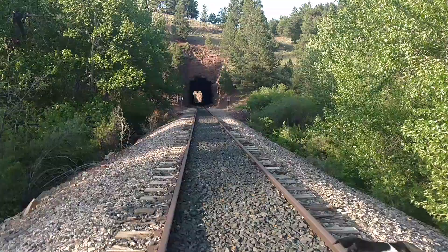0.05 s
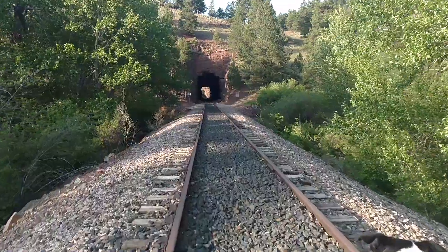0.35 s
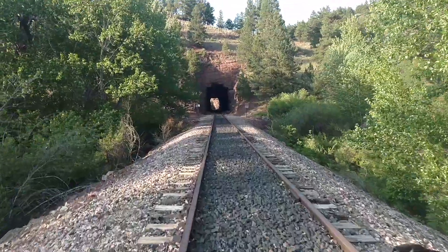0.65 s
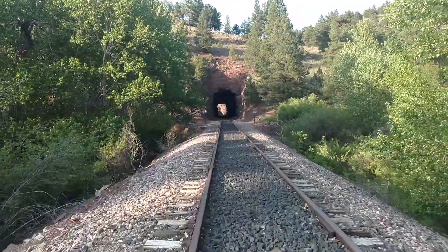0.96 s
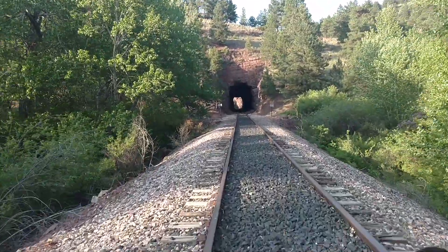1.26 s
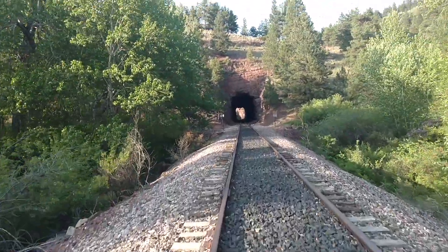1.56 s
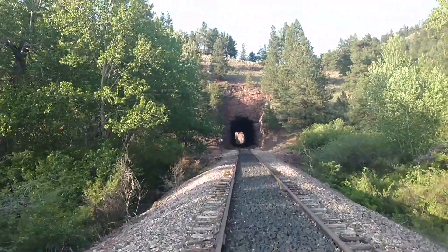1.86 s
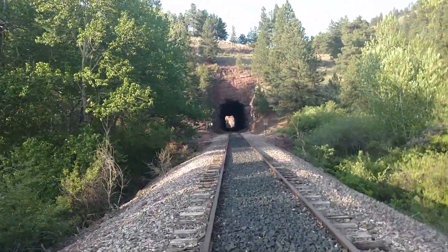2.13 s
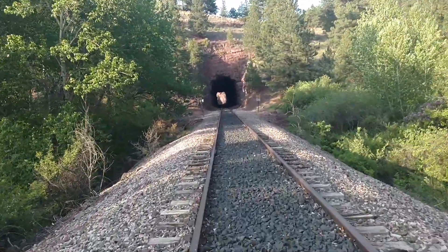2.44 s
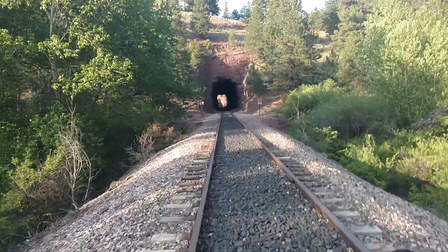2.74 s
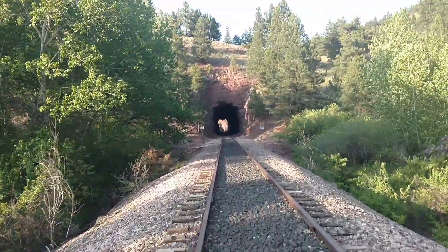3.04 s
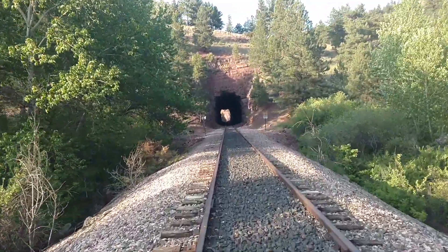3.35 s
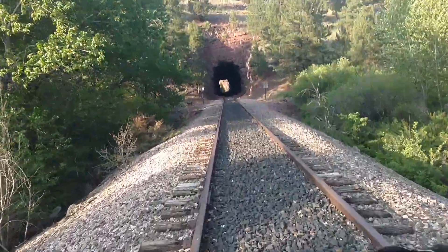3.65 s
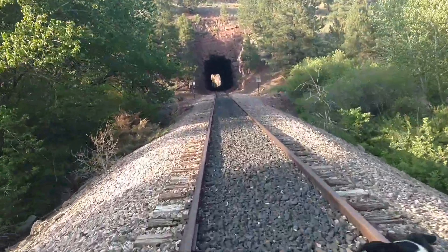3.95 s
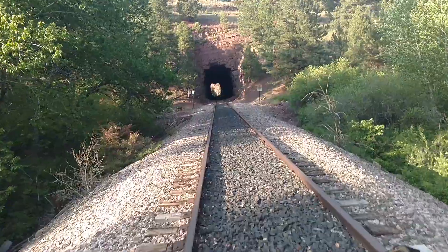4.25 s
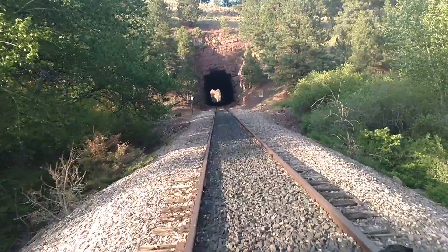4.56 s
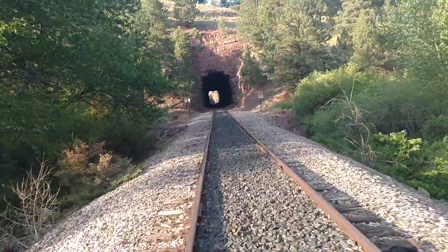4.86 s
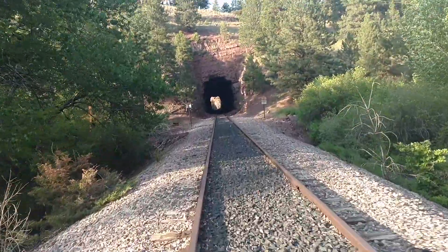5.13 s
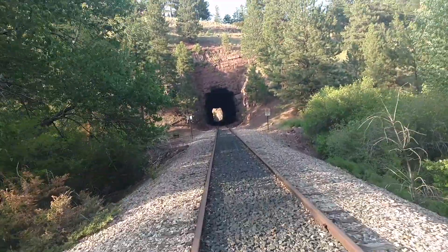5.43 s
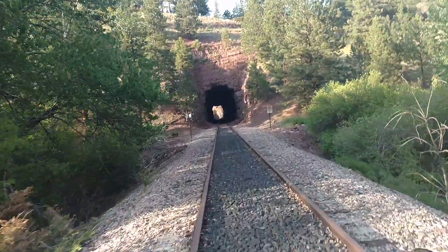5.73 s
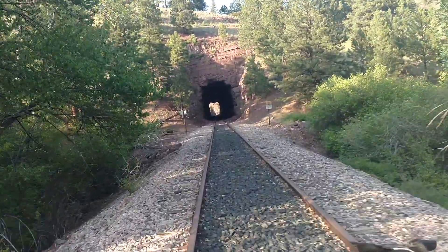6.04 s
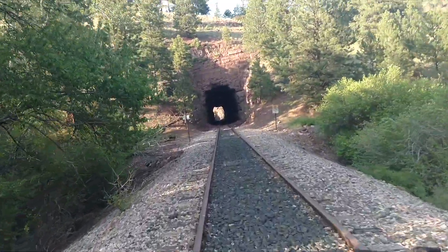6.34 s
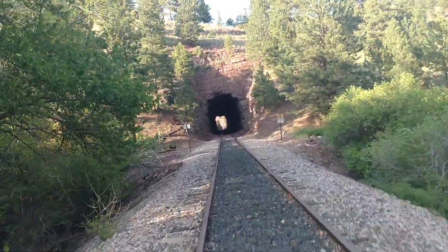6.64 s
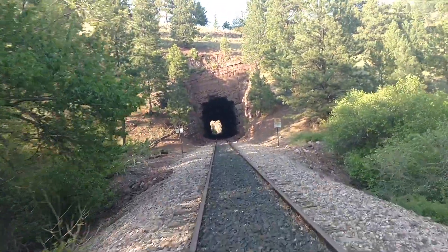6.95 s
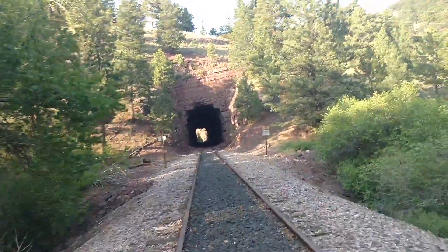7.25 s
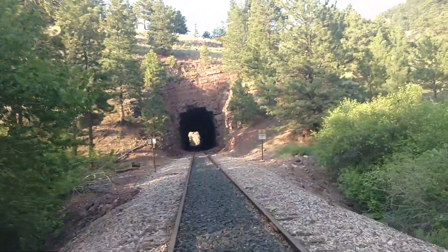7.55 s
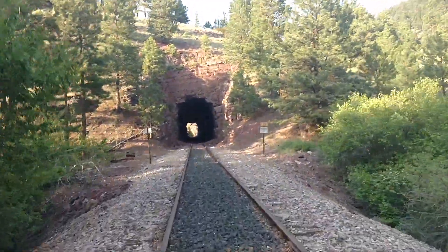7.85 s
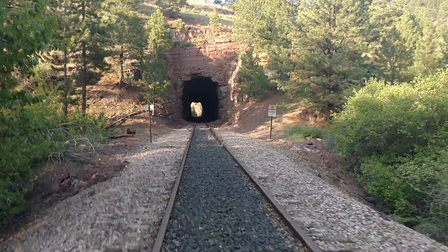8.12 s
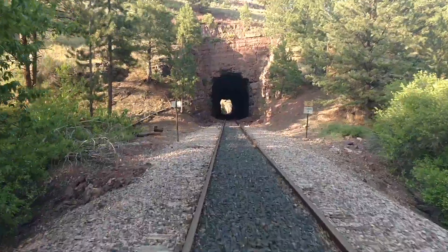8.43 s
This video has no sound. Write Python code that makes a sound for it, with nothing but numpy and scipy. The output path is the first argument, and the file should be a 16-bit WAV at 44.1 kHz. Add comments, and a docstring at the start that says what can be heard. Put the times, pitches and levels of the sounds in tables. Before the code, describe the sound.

Steel wheels clack and rebound about four times a second as a small rail car slowly gathers speed outdoors. The stereo microphone rides near the wheels, picking up a continuous rolling roar, a low engine drone, short metallic rings and rattling fittings. In the second half the rough track sets the floor booming more strongly, and a faint high singing from the wheel rim joins toward the end.

```python
"""Riding a small rail motor car

Open track, a stereo microphone pair on board, close to the wheels. The car slowly gathers speed, its
engine droning under the roar of steel on rail; rough track sets the floor booming and fittings ticking.
Once a wheel turn, about four times a second, loose steel strikes sharply, rebounds with a knock
a fifth of a turn later, and the wheel disc rings."""
import sys
import numpy as np
from scipy import signal
from scipy.fft import rfft, irfft
from scipy.io import wavfile
from scipy.ndimage import uniform_filter1d

SR = 44100
rng = np.random.default_rng(int(sys.argv[2]) if len(sys.argv) > 2 else 0)


def unload_wav(signal):
    """Save mono or channel-first audio to the path in sys.argv[1] as 16-bit WAV at rate SR, clipped to [-1, 1]."""
    wavfile.write(
        sys.argv[1],
        SR,
        np.round(np.clip(np.atleast_2d(signal).T, -1, 1) * 32767).astype(np.int16),
    )


N = 378819
START_TURNS_PER_S, CRUISE_TURNS_PER_S, SPEEDUP_S = 3.8, 4.39, 4.2
MID_ONLY = np.array([[1], [0]])  # every source has two rows: mid and side

# engine speed (time [s], firing rate [Hz])
ENGINE_SPEED = [(0, 28.26), (.53, 28.55), (1.25, 29.35), (3.5, 29.28), (4.8, 29.05), (6.2, 29.33),
                (8.59, 29.2)]
# engine tone (multiple of the firing rate, relative level [dB], change while running slow [dB])
ENGINE_HARMONICS = [(2, -22, -9), (3, -28, -2), (4, -16, 4.5), (5, -5, -4.5), (6, -16, 8), (7, -29, 2),
                    (8, 0, 0), (9, -20, 6), (10, -14, -4), (11, -7.5, -6), (12, -23, 6), (13, -10, -4),
                    (15, -18, 4), (16, -21.5, 2), (18, -6.5, -5), (19, -12.5, -4), (20, -35, -1),
                    (21, -11, -18), (28, -12.5, -6.5), (32, -14.5, -4), (34, -15, -9), (37, -15.5, -1),
                    (41, -12.5, -12)]
# pull of the engine, roughness of the track, boom of the floor, song of the rim (time [s], level [dB])
ENGINE_EFFORT = [(0, -1), (.6, 2), (1.5, 1), (2.1, -0.2), (4.2, -1), (4.5, -1.3), (6.1, -1), (6.7, 1.5),
                 (7.9, 0.5), (8.59, -3)]
TRACK_ROUGHNESS = [(0, -28.5), (.7, -24), (1.5, -21.5), (2.03, -28), (2.35, -22), (2.9, -25), (3.4, -25.5),
                   (3.8, -27.5), (4.15, -20.5), (4.45, -29.5), (4.95, -24.5), (6.1, -25), (6.75, -19.5),
                   (7.45, -24), (7.95, -20.5), (8.55, -25)]
FLOOR_BOOM = [(0, -42), (1.2, -35), (1.6, -34), (1.95, -46), (2.8, -45), (3.5, -32), (3.75, -42),
              (4.1, -45), (4.5, -51), (5.4, -29.5), (5.85, -35), (6.4, -31), (6.7, -30), (6.95, -26),
              (7.25, -31), (7.9, -29), (8.4, -41)]
RIM_SONG = [(0, -38.5), (4.5, -66), (6.3, -43), (6.9, -43), (7.3, -36.5), (7.85, -34.5), (8.25, -37),
            (8.59, -35)]
# resonances of the wheel disc, and a thin whine near 1510 Hz
# (frequency [Hz], width [Hz], lift at ringing=1 [dB])
WHEEL_PEAKS = [(590, 45, 6), (925, 45, 5.5), (1337, 53, 7.5), (1405, 30, 4), (1510, 6, 8), (1618, 30, 13),
               (2230, 26, 7.5), (2480, 6, 8), (3199, 15, 9), (3390, 50, 9), (3840, 43, 10), (3900, 84, 3),
               (4137, 68, 6.5), (4620, 16, 11), (4659, 27, 10), (4940, 140, 8), (5450, 55, 11),
               (5545, 29, 13), (6480, 35, 7), (6595, 34, 10), (7214, 30, 7), (7545, 165, 8.5),
               (8380, 100, 10), (8846, 28, 10.5), (9205, 30, 10), (9908, 40, 12), (11413, 35, 10),
               (13200, 120, -5)]
# spectra of the rolling noises and of the blows (frequency [Hz], relative level [dB])
BODY_RUMBLE = [(25, -33), (45, -8), (70, -5), (100, 1.5), (135, 2.5), (200, 5), (228, 8), (255, 12),
               (285, 7.5), (340, 3), (450, -0.5), (700, -32.5)]
TREAD_ROAR = [(250, -50), (450, 0.5), (600, -1.5), (800, 0.5), (1200, 0), (1500, -3), (1800, 0), (2100, -4),
              (2600, -4.5), (4000, -25.5), (8000, -65)]
WHEEL_HISS = [(1200, -36), (2200, -20), (3200, 3.5), (3700, 0), (4500, 2), (5700, 0.5), (6500, -6.5),
              (9000, -6.5), (10500, -9.5), (12500, -12.5), (15500, -24)]
FLANGE_RUB = [(4000, -32), (5500, 5), (7000, 1), (9200, -2), (10500, 1.5), (12500, -8), (15500, -28)]
STEEL_CHATTER = [(700, -2), (1400, 5.5), (1900, 13.5), (2500, 3), (3200, 7), (4200, 4), (5200, 7),
                 (6500, -5), (8000, -7), (12000, -41)]
STEEL_KNOCK = [(250, -14), (450, 1), (600, 5), (900, 2.5), (1300, 3), (1600, -3), (2000, -4), (2600, 3),
               (5000, -34.5)]
STEEL_SPLASH = [(5000, -20), (7000, -3.5), (9000, 0), (10500, -3), (12000, -4), (14200, -5), (15500, -49)]
# the wheel disc rings out (time [s], level [dB], frequency [Hz], swell time [s])
DISC_RINGS = [(0.169, -16, 1680, 0.0089), (.238, -14, 1620, 0.016), (.517, -8, 1620, 0.02),
              (.794, -13.5, 1598, 0.0076), (1.006, -10.5, 1670, 0.0055), (1.064, -15.5, 1630, 0.0072),
              (1.331, -11, 1615, 0.013), (1.556, -13, 1630, 0.0091), (1.676, -15, 1608, 0.014),
              (1.788, -12, 1674, 0.0067), (1.863, -15, 1598, 0.014), (1.949, -27, 1615, 0.011),
              (2.069, -13, 1634, 0.0096), (2.117, -15, 1600, 0.0072), (2.577, -11.5, 1630, 0.0061),
              (2.885, -22, 1615, 0.012), (3.081, -14.5, 1647, 0.0089), (3.22, -14.5, 1606, 0.011),
              (3.348, -17, 1610, 0.011), (3.381, -14, 1635, 0.014), (3.625, -15.5, 1612, 0.018),
              (4.095, -18, 1635, 0.011), (4.136, -14, 1608, 0.017), (4.602, -21, 1613, 0.012),
              (4.843, -8, 1618, 0.01), (5.324, -23, 1590, 0.011), (5.52, -18, 1618, 0.015),
              (5.756, -12, 1640, 0.0071), (6.05, -20, 1610, 0.021), (6.279, -12, 1610, 0.012),
              (6.518, -11, 1614, 0.014), (6.565, -12, 1623, 0.0088), (6.717, -14, 1603, 0.0074),
              (6.802, -15, 1630, 0.012), (6.99, -15.5, 1603, 0.015), (7.688, -19, 1630, 0.011),
              (8.129, -14.5, 1634, 0.0074), (8.176, -14.5, 1620, 0.017), (8.41, -15.5, 1627, 0.015)]
# one clack a wheel turn (time [s], strike [dB], rebound [dB], knock [dB], brightness [dB])
WHEEL_TURNS = [(0.185, -12.5, -34, -16, 0), (0.462, -17, -19.5, -9.5, -10), (0.736, -18.5, -14, -10.5, 1),
               (1.008, -9, -24, -13, -2), (1.279, -10, -18, -11, -4), (1.543, -13.5, -18, -7, -4),
               (1.805, -12.5, -19, -11.5, 3.5), (2.067, -11.5, -16.5, -9, 5.5), (2.324, -13, -19, -11, 2.5),
               (2.579, -10, -42, -16, -0.5), (2.831, -15, -15, -8.5, 5), (3.084, -10, -15, -9.5, 3.5),
               (3.333, -11.5, -13, -7.5, 2.5), (3.579, -10, -11.5, -9, -1), (3.826, -15.5, -15, -9, -1),
               (4.071, -13, -18, -11.5, -3), (4.314, -11, -22.5, -14.5, 1), (4.557, -37, -13.5, -16.5, 0),
               (4.797, -13, -14, -11.5, 0.5), (5.039, -17, -12.5, -8.5, 0), (5.280, -27, -15, -9, -7),
               (5.519, -10, -15, -13.5, 2.5), (5.76, -12.5, -16.5, -14, 2.5), (5.996, -16, -22, -13.5, 1),
               (6.231, -31, -13, -12, -4), (6.464, -19, -33, -9, -4), (6.708, -12.5, -18.5, -13.5, 2),
               (6.947, -15, -17, -14, 2), (7.185, -19, -18.5, -8, 0), (7.419, -20.5, -21, -13, 4),
               (7.655, -32, -23, -10.5, -5), (7.894, -21, -29, -11.5, -6), (8.131, -12, -41, -11.5, 7),
               (8.366, -12.5, -32, -10.5, 7)]
# blows within each turn (delay [turns], rebound weight [0-1], chatter [dB], knock [dB], chatter decay [s])
TURN_BLOWS = [(0, 0.05, 1, -5.5, 0.011), (0.127, 0.98, -5, -4, 0.0063), (0.203, 0.98, -0.7, -1.5, 0.012),
              (.29, 0.8, -31, -13.5, 0.025), (.56, 0.3, -21, -22.5, 0.04), (0.702, 0.4, -28, -16.5, 0.021)]
# stray blows of the loose steel (time [s], chatter [dB], brightness [dB], knock [dB], chatter decay [s])
STRAY_BLOWS = [(.242, -25, -2, -16, 0.0094), (.500, -23, -4, -11, 0.0079), (1.045, -19, -7, -27, .007),
               (1.560, -14.5, -4, -18, 0.012), (1.577, -16, -2, -19, .009), (3.353, -14, 0, -12, .012),
               (4.102, -18, -7, -16, 0.016), (5.093, -20, 7, -20, 0.01), (6.001, -8.5, -8, -19, 0.0062),
               (6.649, -25, -2, -18, 0.0071), (7.942, -13.5, 2, -8, 0.0063)]
# the microphone pair (frequency [Hz], left minus right [dB], side minus mid [dB], comb depth [dB])
MIC_PAIR = [(40, -2, 8, 2), (70, -10, 7.5, 6.5), (130, -2.5, -11, 1), (350, -4, -4, -12),
            (700, -1.5, -13.5, 2), (1390, -1.2, -9.5, 11), (1880, -5, 0, -0.5), (2532, -0.5, 3, 19),
            (3270, 2, -8.5, -5), (4770, -5.5, 1, 15.5), (5300, 1.5, -0.5, 19.5), (8950, -0.5, 1, 13),
            (15000, 0, 2.5, 8)]
# shifted stereo image (frequency [Hz], change of left minus right [dB], change of side minus mid [dB])
IMAGE_SHIFT = [(200, -1, -1.5), (1600, 2.5, 0.5), (2490, 1.5, -8.5), (3280, -2, 5), (4650, 5, 11.5),
               (5400, -2.5, -1), (6300, 7.5, -10), (8700, 0.5, 0)]
# the image settles and later drifts back (time [s], share of the shifted image [0-1])
IMAGE_DRIFT = [(0, 0.86), (1.3, 0.8), (1.9, 0), (7, 0), (8.2, 0.56)]


def undb(db):
    """Decibels to gain."""
    return 10 ** (np.asarray(db) / 20)


def unit(x):
    """Scale to rms 1."""
    return x / np.sqrt(np.mean(x ** 2))


def curve(table):
    """A table of (time [s], value), sample by sample."""
    return np.interp(np.arange(N) / SR, *np.transpose(table))


def bins():
    """Frequencies of the spectrum, Hz."""
    return np.maximum(np.arange(N // 2 + 1) * SR / N, 1)


def gains(table):
    """Gain at every frequency for each dB column of a table."""
    hz, *columns = np.transpose(table)
    return [undb(np.interp(np.log(bins()), np.log(hz), c)) for c in columns]


def noise(response):
    """Two unrelated noises of rms 1 with the given response."""
    return unit(irfft(rfft(rng.standard_normal((2, N))) * response, N))


def walk(rate_hz):
    """Smooth random wander of rms 1."""
    k = int(SR / rate_hz)
    steps = np.repeat(rng.standard_normal(N // k + 1), k)
    return unit(uniform_filter1d(uniform_filter1d(steps, k), k)[:N])


def wheel(force, spectrum, ringing, grain_db=5):
    """Countless tiny impacts of uneven size, coloured by the wheel's resonances and a thin whine."""
    f = bins()
    response = gains(spectrum)[0]
    for hz, width, db in WHEEL_PEAKS:
        detune = 1j * (f * f - hz * hz) / (f * width)
        response = response * (undb(ringing * db) + detune) / (1 + detune)
    impacts = unit(rng.standard_normal((2, N)) * undb(grain_db * np.clip(rng.standard_normal(N), -2, 2)))
    return irfft(rfft(force * impacts) * response / np.sqrt(np.mean(abs(response) ** 2)), N)


def blows(times, sizes, rise_s, decay_s):
    """Contact force that jumps at each blow and dies away; overlapping blows add in power."""
    power, t = np.zeros(N + SR), np.arange(SR // 3) / SR
    for s, size, decay in np.broadcast(times, sizes, decay_s):
        start = int(s * SR)
        power[start:start + len(t)] += (size * (1 - np.exp(-t / rise_s)) * np.exp(-t / decay)) ** 2
    return np.sqrt(power[:N])


def turn_rate(t):
    """Wheel turns per second at time t: the car gathers speed and levels off."""
    return CRUISE_TURNS_PER_S + (START_TURNS_PER_S - CRUISE_TURNS_PER_S) * np.exp(-t / SPEEDUP_S)


def ride(speed_db, follow):
    """Level in dB: track roughness, its swings scaled by follow, less speed_db per turn/s below cruise."""
    track = curve(TRACK_ROUGHNESS)
    below_cruise = CRUISE_TURNS_PER_S - turn_rate(np.arange(N) / SR)
    return track.mean() + follow * (track - track.mean()) - speed_db * below_cruise


def pressure(peak_turn=0.35):
    """Load of the out-of-round wheel on the rail, -1 to 1 once a turn."""
    turns = curve([(row[0], k) for k, row in enumerate(WHEEL_TURNS)])
    return np.cos(2 * np.pi * (turns - peak_turn))


def strikes():
    """Every turn plays the same pattern of blows and stray ones join in; columns as in STRAY_BLOWS."""
    rows = []
    for s, strike, rebound, turn_knock, bright in WHEEL_TURNS:
        for delay, weight, chatter, knock, decay in TURN_BLOWS:
            peak = chatter + (1 - weight) * strike + weight * rebound
            rows.append((s + delay / turn_rate(s), peak, bright, knock + turn_knock, decay))
    return np.array(rows + list(STRAY_BLOWS))


def engine(db=-27, waver=.0022, flutter_db=1.7, wobble_rad=.22, drone_order=8, slow_span_hz=1.0):
    """Firing harmonics shift balance with speed; the main drone is firm, the rest shake with the car."""
    firing_hz = curve(ENGINE_SPEED)
    slow = np.clip((np.median(firing_hz) - firing_hz) / slow_span_hz, 0, 1)
    phase = 2 * np.pi * np.cumsum(firing_hz * (1 + waver * walk(14))) / SR
    tone = 0
    for order, order_db, slow_db in ENGINE_HARMONICS:
        loose = .3 if order == drone_order else 1
        offset = rng.uniform(0, 2 * np.pi) + loose * wobble_rad * walk(12)
        gain = undb(order_db + slow_db * slow + loose * flutter_db * walk(7.4))
        tone = tone + gain * np.exp(1j * (order * phase + offset))
    # the side channel hears the drone a quarter cycle off
    return undb(db + curve(ENGINE_EFFORT)) * unit(np.array([tone.real, tone.imag]))


def rolling(rumble_db=-7, roar_db=-1, hiss_db=-7.5, shake_db=2, press_db=0.6):
    """Rough rail shakes the body and keeps the wheels roaring and hissing."""
    shake, load = shake_db * walk(45), press_db * pressure()
    rumble = undb(ride(speed_db=4.5, follow=0.54) + rumble_db + shake)
    body = rumble * noise(gains(BODY_RUMBLE)[0])
    roar = undb(ride(speed_db=0, follow=0.74) + roar_db + shake + load)
    tread = wheel(roar, TREAD_ROAR, ringing=1)
    hiss = undb(ride(speed_db=7.5, follow=0.48) + hiss_db + load + walk(60) - 0.5 * walk(600))
    return body + tread + wheel(hiss, WHEEL_HISS, ringing=0.72, grain_db=3.5)


def resonance(hz, half_width_hz):
    """Response of a single mode, 1 at its peak."""
    return 1 / (1 + ((bins() - hz) / half_width_hz) ** 2)


def floor_boom(db=-2, low_mode_db=-4):
    """Rough track sets two modes of the floor booming; they beat against the engine drone."""
    modes = resonance(253, 13) + undb(low_mode_db) * resonance(140, 25)
    return undb(db + curve(FLOOR_BOOM)) * noise(modes)


def rim_song(flicker_db=3, rub_db=-7, sizzle_db=-3, grit_db=3):
    """The rim sings high, louder after each clack, and the rubbing flange sizzles with it."""
    times, peak_db = strikes().T[:2]
    struck = unit(blows(times, undb(peak_db / 2), rise_s=0.0023, decay_s=0.037))
    force = undb(curve(RIM_SONG) + flicker_db * walk(50)) * np.hypot(struck, undb(rub_db))
    song = force * noise(resonance(5470, 100))
    return song + wheel(force * undb(sizzle_db + grit_db * walk(500)), FLANGE_RUB, ringing=1)


def disc_song(hz=1613, wander_hz=10, db=-32.3, press_db=4, flicker_db=4.5):
    """The rail keeps the disc's strongest mode singing in fits, loudest where the wheel presses."""
    phase = 2 * np.pi * np.cumsum(hz + wander_hz * walk(35)) / SR
    return undb(db + press_db * pressure() + flicker_db * walk(30)) * np.sin(phase) * MID_ONLY


def loose_fittings(count=280, db=-19.5, spread_db=3, follow=.55):
    """Loose fittings tick at random, harder the more the floor booms."""
    when, size = rng.random((count, 2)).T
    boom_db = curve(FLOOR_BOOM)
    shake_db = follow * (boom_db - boom_db.max())[(when * N).astype(int)]
    sizes = undb(db + shake_db + spread_db * (2 * size - 1))
    ticks = blows(when * N / SR, sizes, rise_s=0.0005, decay_s=0.003)
    return wheel(ticks, WHEEL_HISS, ringing=0.9, grain_db=0.5)


def disc_rings(stutter_db=2):
    """Some blows pump up the disc's strongest mode, which swells in a short burst and sings on thinly."""
    out, t = np.zeros(N + SR), np.arange(SR // 4) / SR
    for s, db, hz, swell_s in DISC_RINGS:
        start, rise = int(s * SR), (t / swell_s) ** 2
        swell = 2 * rise / (1 + rise ** 2)
        out[start:start + len(t)] += undb(db) * swell * np.sin(2 * np.pi * (hz * t + rng.random()))
    return out[:N] * undb(stutter_db * walk(160)) * MID_ONLY


def clacks(chatter_db=-0.27, tail_db=-14, splash_db=-11.5, rough_db=2, rattle_db=3):
    """Loose steel strikes: a short chatter with a faint tail, a duller knock, a bright rattling splash."""
    times, peak_db, bright_db, knock_db, decay_s = strikes().T
    contact = blows(times, undb(peak_db + chatter_db), rise_s=0.0019, decay_s=decay_s)
    tail = blows(times, undb(peak_db + tail_db), rise_s=0.0019, decay_s=0.035)
    knock = blows(times, undb(knock_db), rise_s=0.003, decay_s=1.12 * decay_s)
    splash = blows(times, undb(peak_db + bright_db + splash_db), rise_s=0.0046, decay_s=decay_s)
    rough = undb(rough_db * walk(700))
    # a blow frees the wheel from the damping of the rail, so it rings more than when rolling
    return (wheel(np.hypot(contact, tail) * rough, STEEL_CHATTER, ringing=1.08)
            + wheel(knock * rough, STEEL_KNOCK, ringing=1.61)
            + wheel(splash * undb(rattle_db * walk(400)), STEEL_SPLASH, ringing=1.19, grain_db=-0.5))


def clinks(db=-17.5, low_hz=3000, high_hz=6700, detune=.012, rise_s=.0015, decay_s=.016, count=4):
    """Each blow lands on another spot, so it sets a different handful of high wheel modes clinking."""
    modes = np.array([hz for hz, _, _ in WHEEL_PEAKS if low_hz < hz < high_hz])
    out, t = np.zeros((2, N + SR)), np.arange(SR // 10) / SR
    fade = (1 - np.exp(-t / rise_s)) * np.exp(-t / decay_s)
    for s, peak_db in strikes()[:, :2]:
        pick, shift, phase = rng.random((3, 2, count, 1))
        hz = modes[(pick * len(modes)).astype(int)] * (1 + detune * (2 * shift - 1))
        tones = np.sin(2 * np.pi * (hz * t + phase)).sum(axis=1)
        start = int(s * SR)
        out[:, start:start + len(t)] += undb(peak_db + db) * fade * tones
    return out[:, :N]


def image(spectra, balance, side_ratio):
    """Left and right from mid and side spectra, a left-to-right balance and a side-to-mid ratio."""
    mid, side = np.array([spectra[0], side_ratio * spectra[1]]) / np.hypot(1, side_ratio)
    return irfft(np.array([(mid + side) * np.sqrt(balance), (mid - side) / np.sqrt(balance)]), N)


def microphones(sound, comb_hz=2600):
    """At the pair, mid and side take turns along the treble like two combs; the image drifts slowly."""
    spectra = rfft(sound)
    balance, width, depth = gains(MIC_PAIR)
    side_ratio = width * depth ** np.cos(2 * np.pi * bins() / comb_hz)
    lean, widen = gains(IMAGE_SHIFT)
    settled = image(spectra, balance, side_ratio)
    shifted = image(spectra, balance * lean, side_ratio * widen)
    drift = curve(IMAGE_DRIFT)
    return (1 - drift) * settled + drift * shifted


def scene():
    """Engine, body and wheels, all heard from on board."""
    running = engine() + rolling() + floor_boom() + rim_song() + loose_fittings()
    return microphones(running + clacks() + clinks() + disc_rings() + disc_song())


def record(dry, top_hz=15500):
    """The recorder clips at full scale and cuts the top."""
    lowpass = signal.ellip(10, .2, 80, top_hz, fs=SR, output="sos")
    return signal.sosfilt(lowpass, np.clip(dry, -1, 1))


dry = scene()
out = record(dry)
unload_wav(out)
```